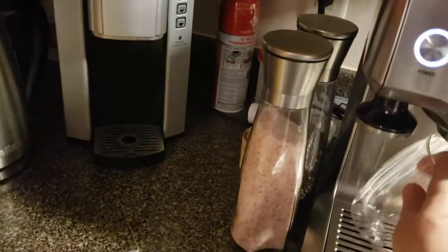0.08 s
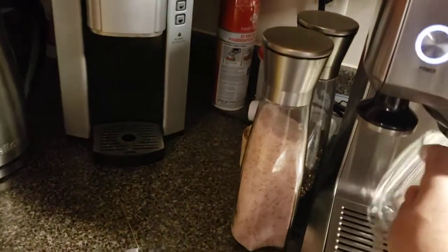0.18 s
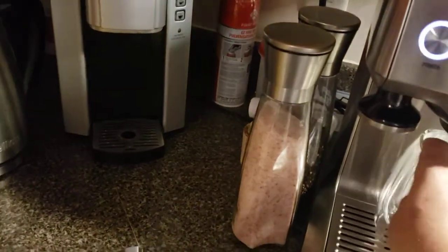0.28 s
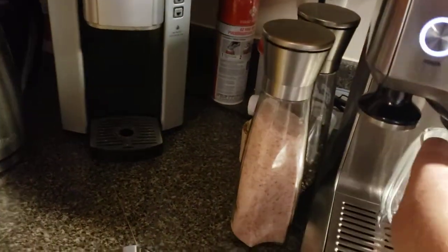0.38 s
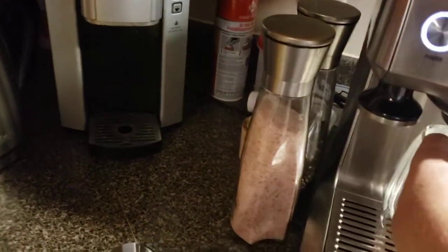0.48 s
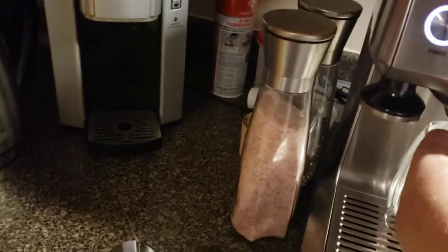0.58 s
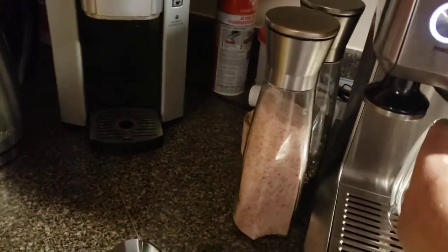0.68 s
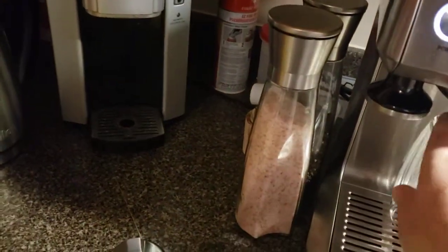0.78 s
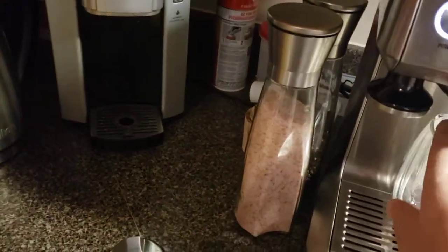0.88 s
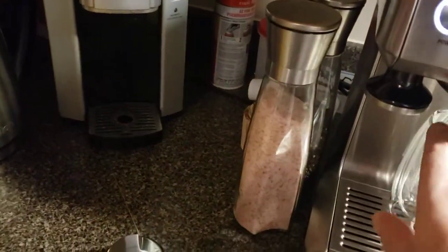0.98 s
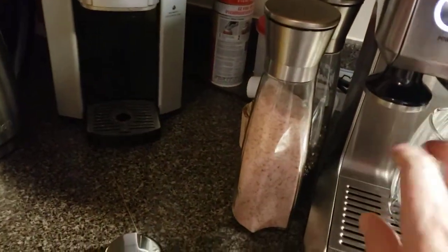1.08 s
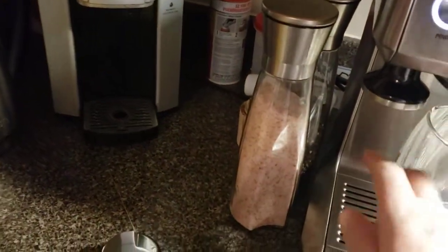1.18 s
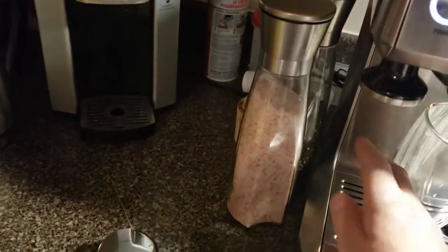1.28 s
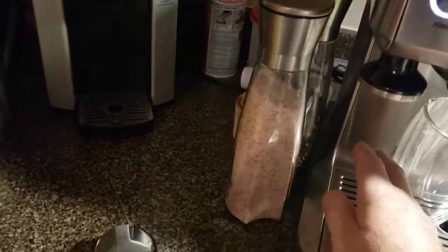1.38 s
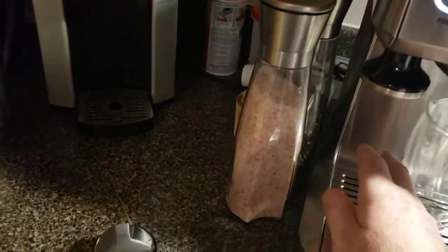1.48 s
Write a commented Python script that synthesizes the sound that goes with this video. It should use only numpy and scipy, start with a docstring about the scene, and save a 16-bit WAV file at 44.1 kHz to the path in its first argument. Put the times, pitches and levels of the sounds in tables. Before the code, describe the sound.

A glass cup knocks hard against an espresso machine's steel, then rattles on its drip tray

```python
"""Quiet kitchen, a stereo microphone close to an espresso machine, the cup mostly off its left side; an appliance hums.
From the start air buffets the ports (filtered noise) and a glass cup scrapes along the steel (noise, stirred modes).
It taps the steel of the espresso machine, then at 0.25 s knocks it hard: a noise crack over ringing modes, a squeal.
A faint creak sinks at 0.64 s; from 0.8 s the cup rocks and skids on the drip tray, its modes struck and stirred
by tiny catches, with gliding sine squeals and low thuds of the casing. A diffuse noise tail makes the room."""
import sys
import numpy as np
from scipy import signal
from scipy.fft import rfft, irfft
from scipy.io import wavfile
from scipy.ndimage import uniform_filter1d

SR = 44100
rng = np.random.default_rng(int(sys.argv[2]) if len(sys.argv) > 2 else 0)


def master(y):
    """Save y as 16-bit WAV."""
    cut = np.clip(np.atleast_2d(y).T, -1, 1)
    pcm = np.round(cut * 32767)  # scale
    wavfile.write(sys.argv[1], SR, pcm.astype(np.int16))


N = 66150
T = np.arange(N) / SR
ALIKE_BELOW_HZ = 970  # the two ports hear much the same below this


def undb(db):
    """Amplitude gain for a level in dB."""
    return 10 ** (np.asarray(db) / 20)


def unit(x):
    """Scale to rms 1."""
    return x / np.sqrt(np.mean(x ** 2))


def pan(left_right_db):
    """Left and right gains, half the level difference each way."""
    return undb(np.array([[.5], [-.5]]) * left_right_db)


def curve(rows, column=1):
    """A table column joined by straight lines in time."""
    rows = np.array(rows)
    return np.interp(T, rows[:, 0], rows[:, column])


def bin_hz():
    """Frequencies of the spectrum's bins, at least 1 Hz."""
    return np.maximum(np.arange(N // 2 + 1) * SR / N, 1)


def by_hz(points):
    """A table of levels joined by straight lines on log frequency."""
    hz, db = np.array(points).T
    return np.interp(np.log(bin_hz()), np.log(hz), db)


def envelope(start, attack, hold, t60):
    """Linear attack, exponential fall once `hold` seconds have passed since the start."""
    age = T - start
    fall = np.exp(-np.log(1000) * np.maximum(age - hold, 0) / t60)
    return np.clip(age / attack, 0, 1) * fall


def convolve(x, response):
    """Each channel through a response, cut to the scene's length."""
    return signal.fftconvolve(np.atleast_2d(x), response, axes=1)[:, :N]


# balance of near sounds at the two ports, mostly to the left: pitch_hz, left_right_db
PORT_BALANCE = [(100, 8), (250, -1), (700, -2), (1300, 3), (4400, 13.5), (8200, 9.5), (10500, -0.5),
                (12500, -2), (15000, 6.5)]


def noise(colour, near=True, tilt_db=0, lift_db=0):
    """Coloured stereo noise at rms 1, alike in the bass; near sounds take the port balance."""
    hz = bin_hz()
    mid, side = rfft(rng.standard_normal((2, N)))
    apart = hz / np.hypot(hz, ALIKE_BELOW_HZ)
    octaves = np.log2(np.maximum(hz, 300) / 3000)  # the tilt turns about 3 kHz
    ports = mid + np.array([[1], [-1]]) * apart * side
    ports = ports * undb(by_hz(colour) + tilt_db * octaves + lift_db)
    return unit(irfft(ports * pan(by_hz(PORT_BALANCE) * near), N))


def resonance(hz, width_hz):
    """A narrow wavering tone: one resonance stirred by noise, rms 1."""
    response = 1 / (1 + 2j * (bin_hz() - hz) / width_hz) ** 2
    return unit(irfft(rfft(rng.standard_normal(N)) * response, N))


def clicks(per_s):
    """Random tiny catches of a sliding contact, rms 1."""
    return unit((rng.random(N) < per_s / SR) * rng.standard_normal(N))


RING_RISE_CYCLES = 3


def ring(modes, start=0):
    """Decaying sine modes; the phase step between the ports grows with pitch up to a limit."""
    out = 0
    draws = rng.uniform(-np.pi, np.pi, (len(modes), 2))
    for (hz, db, t60, pan_db), (phase, lag) in zip(modes, draws):
        step = np.pi / 2 * np.sign(lag) + lag / 10
        step = step * min(hz / ALIKE_BELOW_HZ / 2, 1)
        phases = phase + np.array([[0], [1]]) * step
        rise = RING_RISE_CYCLES / hz
        tone = envelope(start, rise, rise, t60) * np.sin(2 * np.pi * hz * T + phases)
        out = out + undb(db) * pan(pan_db) * tone
    return out


MODE_WIDTH_HZ = 75


def peaks(modes, db):
    """The dB lift that an object's modes give to contact noise, strongest in the treble."""
    hz = bin_hz()
    bumps = [1 / (1 + ((hz - mode[0]) / MODE_WIDTH_HZ) ** 2) for mode in modes]
    return db * np.max(bumps, axis=0) * hz / (hz + 2000)


# colour of the quiet kitchen: pitch_hz, relative_level_db (per Hz)
KITCHEN_COLOUR = [(25, -19), (60, -0.5), (130, -12), (270, -8.5), (400, -15), (530, -12), (760, -28.5),
                  (1400, -39), (10000, -35.5), (12700, -24)]
KITCHEN_DB, KITCHEN_PAN_DB = -64.5, 2
HUM_HZ, HUM_DB, HUM_PAN_DB = 55, -65.5, -8.5
DRONE_HZ, DRONE_WIDTH_HZ, DRONE_DB = 204, 39, -72


def kitchen():
    """Steady room noise, an appliance's sine hum and its wavering drone, a noise-stirred resonance."""
    air = undb(KITCHEN_DB) * pan(KITCHEN_PAN_DB) * noise(KITCHEN_COLOUR, near=False)
    hum = undb(HUM_DB) * pan(HUM_PAN_DB) * np.sin(2 * np.pi * HUM_HZ * T)
    drone = undb(DRONE_DB) * resonance(DRONE_HZ, DRONE_WIDTH_HZ)
    return air + hum + drone


# gusts at the microphone ports: time_s, level_db (before BUFFET_DB), left_right_db
GUSTS = [(0.0, -30, -1.5), (0.032, -47, -1.5), (0.228, -63.5, -5), (0.266, -32.5, -5), (0.342, -44.5, -8),
         (0.396, -40.5, -26), (0.466, -52.5, -22.5), (0.512, -69.5, -2), (0.676, -49, -4.5),
         (0.802, -58.5, 9), (0.818, -48.5, 7), (1.37, -78, -1), (1.5, -56.5, -4)]
# colour of the gusts: pitch_hz, relative_level_db (per Hz)
GUST_COLOUR = [(15, -29), (35, -16), (55, 3), (92, -7.5), (125, -19), (1000, -84.5)]
BUFFET_DB = -2.5


def buffeting():
    """Moving air and handling rumble at the ports: low noise, evened out and then shaped by the gusts."""
    rumble = noise(GUST_COLOUR, near=False)
    power = uniform_filter1d(np.mean(rumble ** 2, axis=0), size=2200)  # 50 ms average
    rumble = rumble / np.sqrt(power)
    return rumble * undb(BUFFET_DB + curve(GUSTS)) * pan(curve(GUSTS, column=2))


ROOM_DB, ROOM_ONSET_S = -23, 0.004
ROOM_T60_S, ROOM_TREBLE_T60_S = 0.47, 1


def room(x):
    """A diffuse tail of decaying noise, the treble part fading more slowly."""
    low_colour = [(100, 6.5), (3500, 1.0), (7000, -3.0), (16000, -28)]
    high_colour = [(1000, -24.5), (6000, -8.0), (16000, 6.5)]
    low = noise(low_colour, near=False) * envelope(0.001, ROOM_ONSET_S, 0, ROOM_T60_S)
    high = noise(high_colour, near=False) * envelope(.004, ROOM_ONSET_S, 0, ROOM_TREBLE_T60_S)
    tail = unit(low + undb(-5) * high) / np.sqrt(N)
    crossed = x + 0.1 * x[::-1]  # a little of each side feeds the other
    return undb(ROOM_DB) * convolve(crossed, tail)


# glass scraping along the steel: time_s, level_db (before the grit)
SCRAPE = [(0, -49), (0.06, -56.5), (0.18, -56), (0.215, -48.5), (0.255, -36.5), (0.4, -64), (0.55, -69.5),
          (0.63, -81.5)]
# colour of the scrape: pitch_hz, relative_level_db (per Hz)
SCRAPE_COLOUR = [(180, -30.5), (300, -4), (960, -5.5), (1150, -9), (1550, -4.5), (2320, -13.5),
                 (3250, -8.5), (4670, -22), (16000, -16.5)]
# fluttering squeak as the cup slides: time_s, level_db
SQUEAK_LEVEL = [(0.03, -86.5), (0.08, -70), (0.19, -65), (0.23, -44.5), (0.27, -61), (0.39, -71),
                (0.47, -68), (0.57, -79), (0.64, -103)]
# dull rubbing of the hand on the cup: time_s, level_db
HAND_RUB = [(0, -61), (0.025, -45), (0.045, -68.5), (0.14, -53.5), (0.2, -59), (0.3, -53), (0.52, -58),
            (0.78, -96.5), (0.92, -63), (1.15, -74)]
# colour of the rubbing: pitch_hz, relative_level_db (per Hz)
HAND_COLOUR = [(80, -10), (190, 0), (380, -7), (540, 4), (700, -8.5), (920, -1), (1200, -26.5),
               (4000, -41.5)]
SLIDE_CLICKS_PER_S, SLIDE_SOFT_HZ, SLIDE_RING_DB = 700, 2500, -11
GRIT_DB, GRIT_S = 3.5, .006  # rms unevenness of the scrape and its averaging time
SQUEAK_HZ, SQUEAK_WIDTH_HZ, SQUEAK_PAN_DB = 3035, 21, 16


def sliding():
    """Glass scrapes unevenly along the steel, stirs its lower modes and squeaks; the hand rubs dully."""
    soften = 1 / (1 + (bin_hz() / SLIDE_SOFT_HZ) ** 2) ** 2
    catches = irfft(rfft(clicks(SLIDE_CLICKS_PER_S)) * soften, N)
    stirred = unit(convolve(catches, ring(STEEL_MODES)))
    grit = unit(uniform_filter1d(rng.standard_normal(N), size=int(GRIT_S * SR)))
    scrape = noise(SCRAPE_COLOUR) + undb(SLIDE_RING_DB) * stirred
    scrape = undb(curve(SCRAPE) + GRIT_DB * grit) * scrape
    squeak = undb(curve(SQUEAK_LEVEL)) * pan(SQUEAK_PAN_DB) * resonance(SQUEAK_HZ, SQUEAK_WIDTH_HZ)
    rubbing = undb(curve(HAND_RUB)) * noise(HAND_COLOUR)
    return scrape + squeak + rubbing


CREAK_START_S, CREAK_LENGTH_S, CREAK_T60_S = 0.64, .07, 0.84
CREAK_HZ, CREAK_SAG_HZ_PER_S = 630, 257
CREAK_DB, CREAK_THIRD_DB, CREAK_PAN_DB = -68.5, -19, -7.5


def creak():
    """A soft tone and its third harmonic, sinking as the cup drags and then fading."""
    age = np.clip(T - CREAK_START_S, 0, CREAK_LENGTH_S)
    phase = 2 * np.pi * np.cumsum(CREAK_HZ - CREAK_SAG_HZ_PER_S * age) / SR
    tone = np.sin(phase) + undb(CREAK_THIRD_DB) * np.sin(3 * phase)
    shape = envelope(CREAK_START_S, 0.0057, CREAK_LENGTH_S, CREAK_T60_S)
    return undb(CREAK_DB) * pan(CREAK_PAN_DB) * shape * tone


# stick-slip squeals: start_s, hold_s, level_db (before panning), pitch_hz, glide_hz_per_s
STICK_SLIPS = [(0.237, 0.0047, -37, 4240, -2.5), (0.807, 0.017, -29.5, 3255, 912),
               (0.808, 0.053, -47, 5074, 300), (0.866, 0.036, -48, 5255, -600),
               (0.888, 0.01, -31, 3327, 304), (0.89, 0.016, -39.5, 8340, 0),
               (0.923, 0.0077, -41, 3335, -300), (1.074, 0.021, -42.5, 3335, 105),
               (1.446, 0.022, -42, 3213, 9), (1.466, 0.026, -36, 3222, 1800.5),
               (1.476, 0.0079, -44, 1568, 2499)]
SQUEAL_ATTACK_S, SQUEAL_T60_S = 0.0069, 0.07
SQUEAL_PAN_DB, SQUEAL_WOBBLE_HZ = 14, 22


def squeals():
    """Stick-slip friction sings one wobbling, gliding sine for a moment, then lets it ring out."""
    out = 0
    for start, hold, db, hz, glide in STICK_SLIPS:
        wobble = unit(uniform_filter1d(rng.standard_normal(N), size=150))
        pitch = hz + glide * np.clip(T - start, 0, 2 * hold) + SQUEAL_WOBBLE_HZ * wobble
        phase = 2 * np.pi * np.cumsum(pitch) / SR
        ports = np.sin(phase + np.array([[np.pi / 2], [0]]))  # a quarter cycle apart
        out = out + undb(db) * envelope(start, SQUEAL_ATTACK_S, hold, SQUEAL_T60_S) * ports
    return out * pan(SQUEAL_PAN_DB)


# modes of the glass cup: pitch_hz, relative_level_db, t60_s, left_right_db
CUP_MODES = [(1715, -8, 0.062, 4.5), (2202, -1.5, 0.032, 13.5), (3304, -6, 0.29, 6.5),
             (3744, -14, 0.076, 10.5), (5163, -6.5, 0.18, 5.5), (7200, -12, 0.14, 4.5),
             (7660, -7, 0.08, 18), (7870, -12.5, 0.16, 15.5), (8340, -11, 0.11, 19.5),
             (9080, -14.5, 0.066, 18), (9820, -26, 0.28, -10), (12170, -11.5, 0.069, 3),
             (12000, -7, 0.074, -6.5), (14100, -22, 0.074, 6), (14600, -8.5, 0.043, 10)]
TWIN_SPLIT, TWIN_DB, STRIKE_SPREAD_DB = 0.0045, -8.5, 1.5  # split as a share of the pitch


def cup_ring(start=0):
    """The cup is not quite round: each mode beats with a weaker twin, differently at each contact."""
    modes = []
    draws = rng.standard_normal((len(CUP_MODES), 2))
    for (hz, db, t60, pan_db), (strike, split) in zip(CUP_MODES, draws):
        db = db + STRIKE_SPREAD_DB * strike
        twin_hz = hz * (1 + TWIN_SPLIT * (1 + split / 2))
        modes += [(hz, db, t60, pan_db), (twin_hz, db + TWIN_DB, t60, pan_db)]
    return ring(modes, start)


# the cup landing on the drip tray: start_s, relative_ring_db, relative_chatter_db, skid_s,
# treble_tilt_db_per_octave
LANDINGS = [(0.7999, 2.5, 0.5, 0.028, 1), (0.8647, -6.5, 3.5, 0.016, 1), (0.927, -34, -14, 0.009, -2),
            (0.9712, -4.5, -8, 0.014, -1), (1.076, -15, -12.5, 0.0068, -0.5),
            (1.4464, -15, -16, 0.0056, -1.5), (1.466, -10.5, -9.5, 0.064, -2)]
# colour of the glass chattering on the tray: pitch_hz, relative_level_db (per Hz)
CHATTER_COLOUR = [(59, -43), (100, -6), (308, -3), (1170, -15.5), (1550, -7.5), (2170, -15), (2630, -16.5),
                  (3250, -5), (4500, -22.5), (5200, -20.5), (6400, -21.5), (7700, -18), (8800, -25.5),
                  (15000, -16), (16000, -51)]
# modes of the casing under the tray: pitch_hz, relative_level_db, t60_s, left_right_db
CASING_MODES = [(97, -1, 0.35, -0.5), (176, -10, 0.54, 6), (235, -7, 0.75, 2.5), (328.5, -3.5, 0.2, -5)]
CUP_DB, CUP_PEAK_DB, CASING_DB = -36, 13, -45.5
CHATTER_DB, CHATTER_T60_S = -34.5, 0.11
SKID_DRIVE, SKID_CLICKS_PER_S = 0.78, 1000


def rocking():
    """Each landing rings cup and casing and chatters, then skids in a burst of tiny catches."""
    out, lift_db = 0, peaks(CUP_MODES, CUP_PEAK_DB)
    for start, ring_db, chatter_db, skid, tilt_db in LANDINGS:
        catches = clicks(SKID_CLICKS_PER_S) * envelope(start, .002, skid, .03)
        catches = catches / np.sqrt(SR / 50)
        cup = cup_ring(start) + SKID_DRIVE * convolve(catches, cup_ring())
        chatter = noise(CHATTER_COLOUR, tilt_db=tilt_db, lift_db=lift_db)
        chatter = chatter * envelope(start, 0.00095, skid, CHATTER_T60_S)
        # the thud grows less than the ring with a harder landing
        thud = undb(CASING_DB + 0.79 * ring_db) * ring(CASING_MODES, start)
        out = out + undb(ring_db + CUP_DB) * cup + undb(chatter_db + CHATTER_DB) * chatter + thud
    return out


# colour of the crack, the steel's dense short modes: pitch_hz, relative_level_db (per Hz)
CRACK_COLOUR = [(70, -37), (676, -5), (1080, -10.5), (1420, -13), (3050, -8), (4290, -13), (5600, -19.5),
                (6560, -23), (7290, -14.5), (10700, -23), (11400, -13), (15000, -16.5), (16000, -37)]
PANEL_COUNT, PANEL_LOW_HZ, PANEL_HIGH_HZ = 44, 2000, 13000
PANEL_DB, PANEL_T60_S = -43.5, 0.2


def panels():
    """Scattered modes of the machine's sheet metal, coloured like the crack."""
    scatter = 1 + rng.uniform(-1, 1, PANEL_COUNT) / PANEL_COUNT
    hzs = np.geomspace(PANEL_LOW_HZ, PANEL_HIGH_HZ, PANEL_COUNT) * scatter
    levels = np.interp(hzs, bin_hz(), by_hz(CRACK_COLOUR))
    sides = np.interp(hzs, bin_hz(), by_hz(PORT_BALANCE))
    return [(hz, db - levels.max(), PANEL_T60_S, side) for hz, db, side in zip(hzs, levels, sides)]


# the cup knocking the steel: start_s, relative_crack_db, relative_ring_db, treble_tilt_db_per_octave
BLOWS = [(0.127, -25, -33.5, -3), (0.2494, 1, -0.5, 1.5)]
# modes of the steel, struck here and stirred by the sliding:
# pitch_hz, relative_level_db, t60_s, left_right_db
STEEL_MODES = [(200, -17.5, 0.076, -0.5), (321, -20, 0.11, -2.5), (1451, -14, 0.065, 13.5),
               (1925, -14.5, 0.11, 6), (2978, -7.5, .085, 13.5), (3215, -11, 0.025, 6),
               (4217, -15, 0.1595, 7.5), (5080, -19, 0.12, 6.5), (5510, -20.5, 0.16, 4.5),
               (5960, -18, 0.13, 2), (7100, -4.5, 0.056, 11), (7330, -7.5, 0.059, 11),
               (8340, -12.5, .09, 18), (9890, -10.5, 0.032, 4), (13120, -9.5, 0.0759, 1.5),
               (15200, -12.5, 0.17, 11.5)]
CRACK_DB, CRACK_T60_S = -19.5, 0.081
STEEL_DB, STEEL_PEAK_DB = -13, 8


def knocks():
    """A light tap, then a hard blow: dense crack, ringing steel modes and the panels' weak shimmer."""
    out, sheet = 0, panels()
    lift_db = peaks(STEEL_MODES, STEEL_PEAK_DB)
    for start, crack_db, ring_db, tilt_db in BLOWS:
        crack = noise(CRACK_COLOUR, tilt_db=tilt_db, lift_db=lift_db)
        crack = crack * envelope(start, 0.000405, 0.007, CRACK_T60_S)
        metal = undb(STEEL_DB) * ring(STEEL_MODES, start) + undb(PANEL_DB) * ring(sheet, start)
        out = out + undb(crack_db + CRACK_DB) * crack + undb(ring_db) * metal
    return out


def scene():
    """The kitchen and the air at the ports, under the near sounds and their room tail."""
    near = sliding() + creak() + squeals() + rocking() + knocks()
    return kitchen() + buffeting() + room(near) + near


TOP_HZ = 15900


def record(dry):
    """The recorder cuts the top with a steep low-pass."""
    low_pass = signal.ellip(8, .2, 70, TOP_HZ, fs=SR, output="sos")
    return signal.sosfilt(low_pass, dry)


dry = scene()
out = record(dry)
master(out)
```